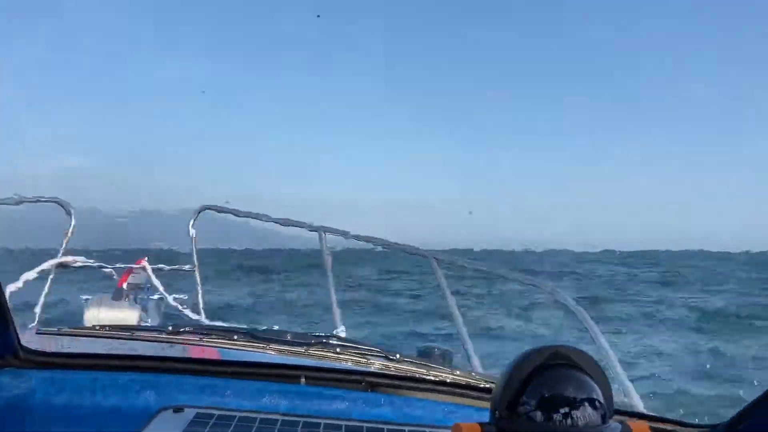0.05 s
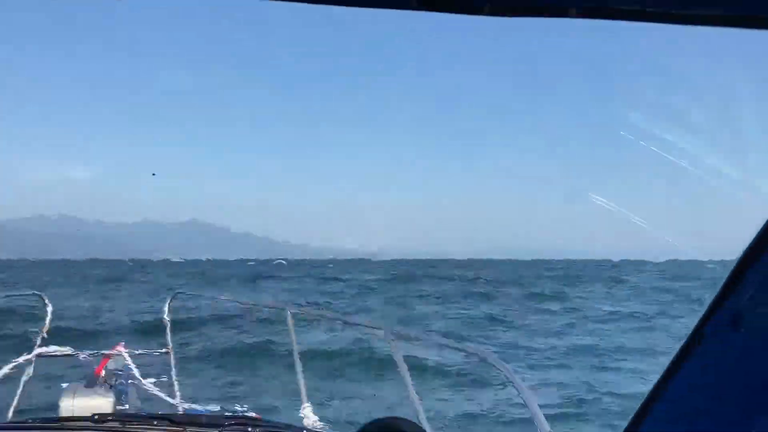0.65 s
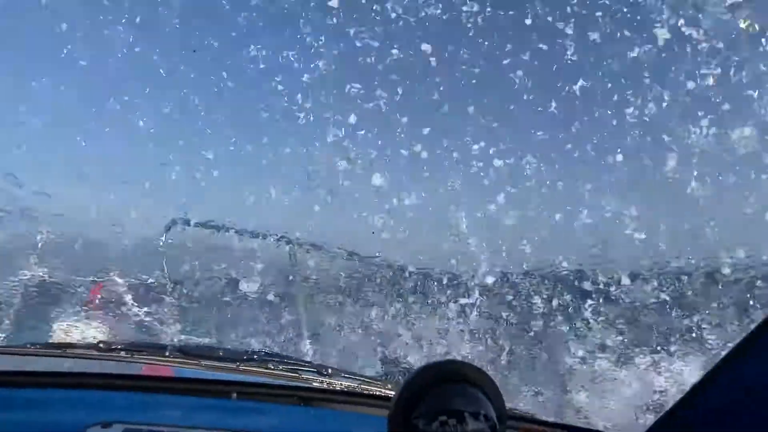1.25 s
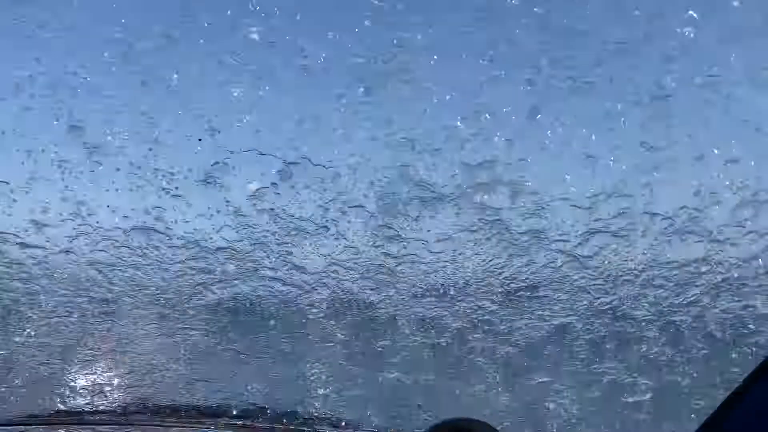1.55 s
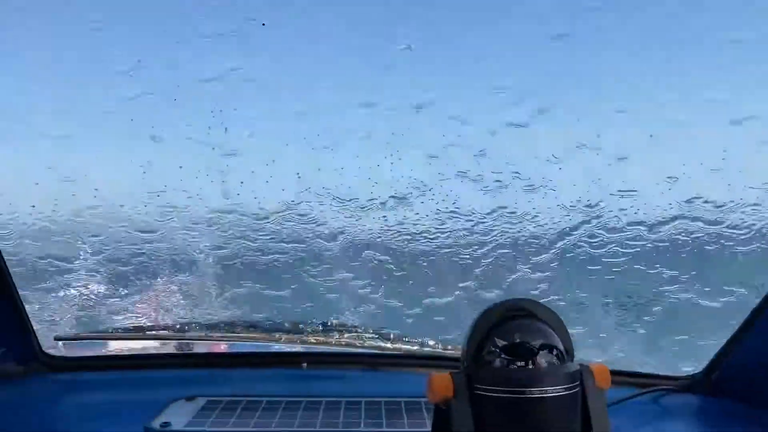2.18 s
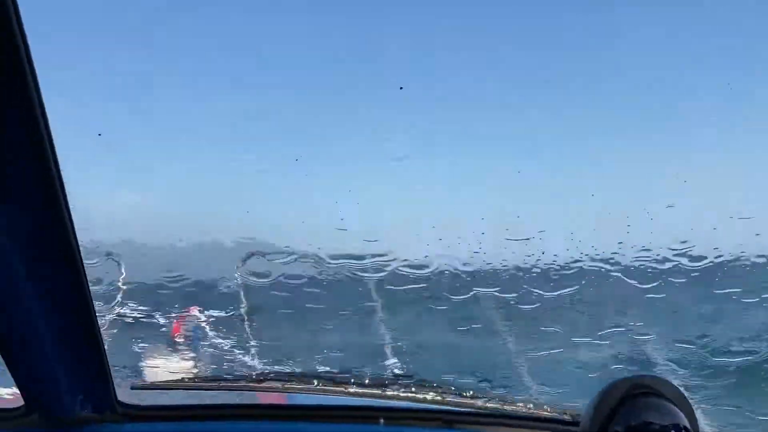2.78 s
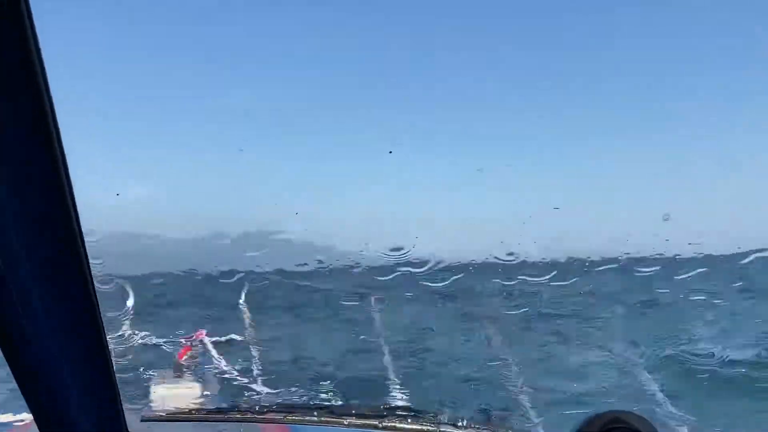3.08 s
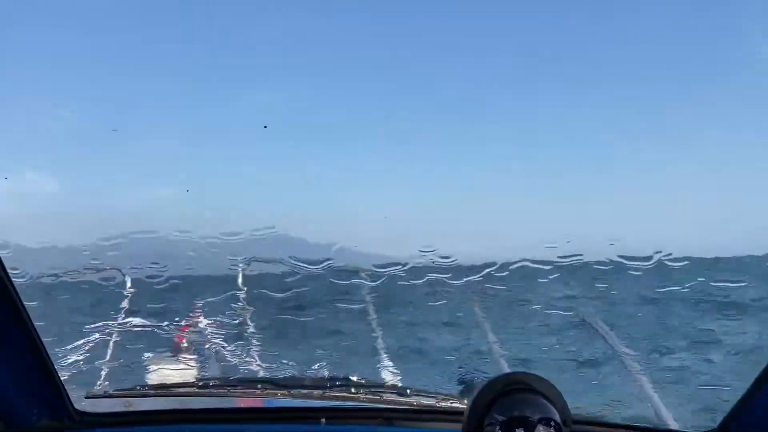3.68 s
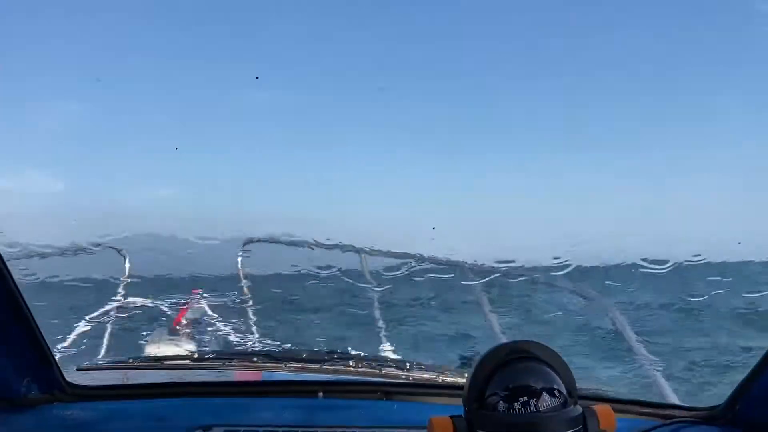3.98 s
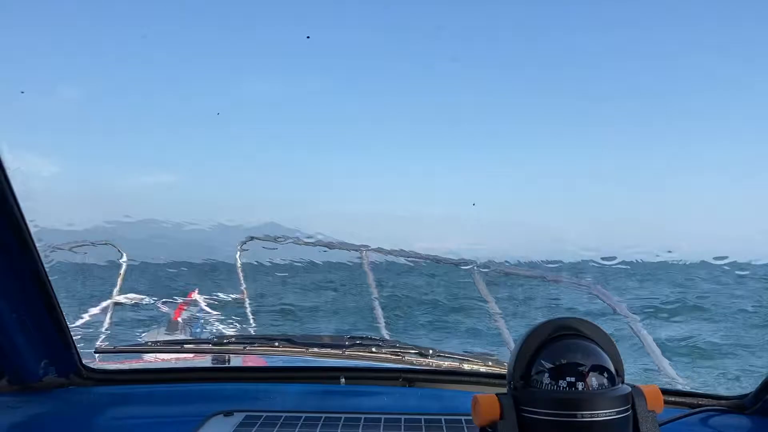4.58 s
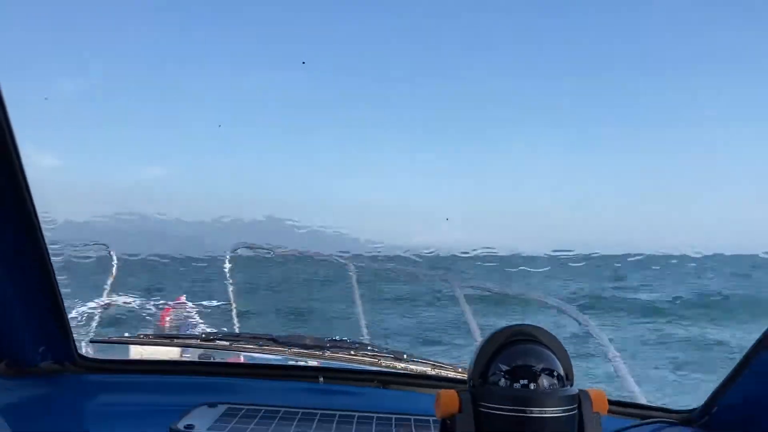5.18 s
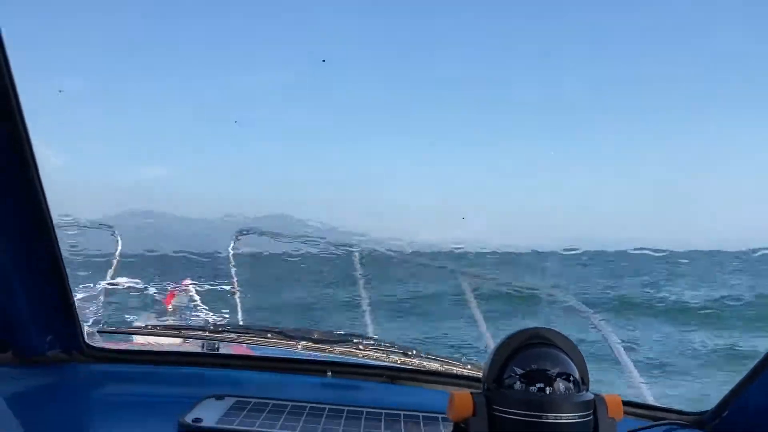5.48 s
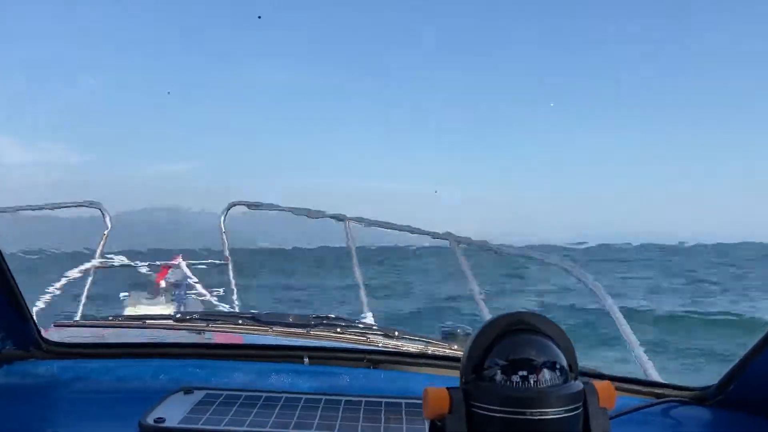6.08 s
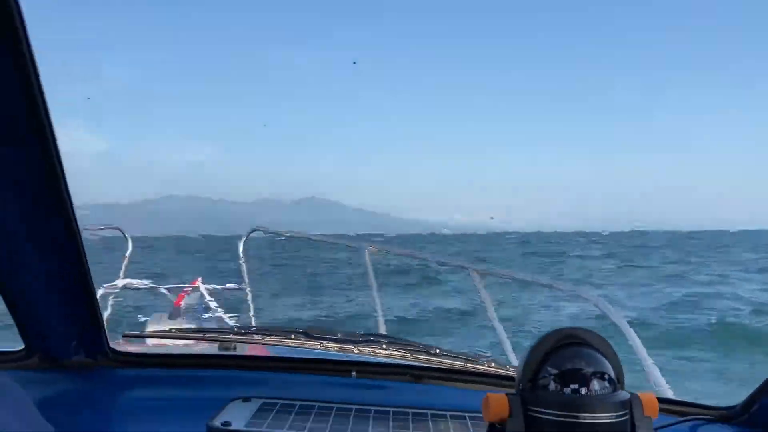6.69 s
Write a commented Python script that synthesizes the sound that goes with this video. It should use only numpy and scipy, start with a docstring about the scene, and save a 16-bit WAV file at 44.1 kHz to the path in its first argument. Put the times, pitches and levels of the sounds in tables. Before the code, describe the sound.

A small motorboat pushes through choppy sea, heard in stereo from within its cabin. A low engine drone, hull rumble and churning water run throughout. Heavy waves hit the bow in the first half, each with a boom and a smack of water on the glass, amid showers of hissing spray. A fitting buzzes faintly twice, and smaller thumps and hollow slaps keep coming to the end.

```python
"""Inside the cabin of a small motorboat in choppy sea, on a stereo pair of microphones.
From the start the engine drones and rattles, water rushes and gurgles along the hull, and spray hisses
on the windshield. Waves slam the bow near 0.5, 1.8 and 3.2 s: panels boom, trapped air slaps, sheets of
water smack the glass. Two faint buzzes of cabin fittings follow. More slams come from 4.3 to 5.6 s and
around 6.5 s, while the engine runs on."""
import sys
import numpy as np
from scipy import signal
from scipy.fft import rfft, irfft, next_fast_len
from scipy.io import wavfile
from scipy.ndimage import uniform_filter1d, minimum_filter1d

SR = 44100
rng = np.random.default_rng(int(sys.argv[2]) if len(sys.argv) > 2 else 0)


def write(x):
    x = np.atleast_2d(x).T
    wavfile.write(sys.argv[1], SR, np.round(np.clip(x, -1, 1) * 32767).astype(np.int16))


N = 302085
T = np.arange(N) / SR
CYLINDERS = 5
FOAM_LINGER_S = 1.0


def gain_of(db):
    return 10 ** (np.asarray(db) / 20)


def unit_rms(x):
    return x / np.sqrt(np.mean(x ** 2) + 1e-20)


def at_hz(points, hz):
    """A spectrum table read on a log-frequency axis."""
    f, value = np.transpose(points)
    return np.interp(np.log(hz + 1), np.log(f + 1), value)


def follow(points):
    """A time curve at every sample."""
    return np.interp(T, *np.transpose(points))


def add(mix, s, sound):
    """Lays a sound into the mix at time s."""
    part = mix[:, max(round(s * SR), 0):][:, :sound.shape[1]]
    part += sound[:, :part.shape[1]]


def drift(rate_hz):
    """A random wander of rms 1, with little motion above the rate."""
    step = 128
    knots = rng.standard_normal(N // step + 2)
    f = np.fft.rfftfreq(len(knots), step / SR)
    slow = unit_rms(irfft(rfft(knots) / (1 + (f / rate_hz) ** 4), len(knots)))
    return np.interp(np.arange(N) / step, np.arange(len(slow)), slow)


def bell(s, half_s):
    """A smooth swell of height 1 around time s."""
    return np.exp(-((T - s) / half_s) ** 2)


def surge(rise_s, t60):
    """A load that builds up, then falls 60 dB in t60 seconds."""
    t = T[:SR]
    return np.minimum(t / rise_s, 1) * gain_of(-60 * np.maximum(t - rise_s, 0) / t60)


def grains(per_s, spread_db, size=N):
    """Two trains of random impacts: many small, a few large."""
    chance = rng.uniform(-1, 1, (2, size)) * SR / per_s
    hit = abs(chance) < 1
    strength = np.minimum(-np.log(abs(chance[hit])), 4)
    out = np.zeros((2, size))
    out[hit] = np.sign(chance[hit]) * gain_of(spread_db * strength)
    return unit_rms(out)


def ring(drive, hz, width_hz):
    """One resonance."""
    r = np.exp(-np.pi * width_hz / SR)
    poles = [1, -2 * r * np.cos(2 * np.pi * hz / SR), r * r]
    return signal.lfilter([(1 - r) / 2, 0, (r - 1) / 2], poles, drive)


def plinks(count, low_hz, high_hz, db, tilt_db, t60, glide, spread_db):
    """Short rings at random times, pitches and sides; level tilts per octave, pitch climbs as each dies."""
    out = np.zeros((2, N))
    for when, pitch, size, side, life in rng.random((count, 5)):
        hz, length = low_hz * (high_hz / low_hz) ** pitch, t60 * (.5 + life)
        t = T[:round(length * SR)]
        attack = 1 - np.exp(-t * hz / 2)
        tone = attack * np.sin(2 * np.pi * hz * t * (1 + glide * t / length / 2))
        level_db = db + tilt_db * np.log2(hz / low_hz) + spread_db * min(-np.log(1 - size), 3)
        pan = np.sqrt([[side], [1 - side]])
        add(out, when * N / SR, pan * tone * gain_of(level_db - 60 * t / length))
    return out


def reflected(x, t60=0.1084, wet=0.459):
    """Close walls and windows return a short, dense cluster of echoes, different at each microphone."""
    t = T[:SR // 8]
    taps = rng.standard_normal((2, len(t))) * gain_of(-60 * t / t60)
    taps *= wet / np.linalg.norm(taps[0])
    taps[:, 0] = 1  # direct sound
    return signal.oaconvolve(x, taps, axes=1)[:, :x.shape[1]] / np.hypot(1, wet)


# How alike the two microphones hear the cabin: f/Hz, likeness (negative is opposed)
MIC_LIKENESS = [(60, 0.978), (130, 1), (200, 0.64), (300, 0.144), (800, 0.208), (1600, -0.247),
                (2300, 0.035), (5900, -0.063), (7100, 0.78), (9200, -1.303), (10900, 0.87), (11800, 0.84),
                (13600, -1.23), (15400, 0.57)]
# Balance across the pair: f/Hz, left minus right/dB
MIC_BALANCE = [(60, 5.5), (120, 3), (220, 3), (400, 2), (1300, 2), (2400, 1.5), (4400, 0)]

def in_cabin(drive, colour):
    """Two unrelated signals coloured and spread over the pair at rms 1:
    bass alike and to the left, middle diffuse, high treble by turns alike and opposed."""
    size = next_fast_len(drive.shape[1], True)
    hz = np.fft.rfftfreq(size, 1 / SR)
    a, b = rfft(drive.astype(np.float32), size)
    same = np.clip(at_hz(MIC_LIKENESS, hz), -1, 1)
    lean = gain_of(at_hz(MIC_BALANCE, hz) / 2)
    left, right = a * lean, (same * a + np.sqrt(1 - same ** 2) * b) / lean
    pair = np.array([left, right]) * gain_of(at_hz(colour, hz))
    return unit_rms(irfft(pair.astype(np.complex64), size)[:, :drive.shape[1]])


def engine_tone(angle, order, db, lean_db, unsteady, waver_hz=4):
    """One order of the engine cycle, wavering in strength and phase."""
    phase = round(order) * angle + 2 * np.pi * rng.random()
    tone = (np.sqrt(2) + unsteady * drift(waver_hz)) * np.cos(phase)
    tone += unsteady * drift(waver_hz) * np.sin(phase)
    return gain_of(db) * tone / np.hypot(1, unsteady) * gain_of([[lean_db / 2], [-lean_db / 2]])


# Faint overtones ringing round the cabin: multiple of the firing rate, level/dB
FIRING_OVERTONES = [(5, -45.5), (6, -52), (8, -50.5), (10, -50.5), (15, -52)]

def overtones(angle):
    """The higher overtones reach each microphone by their own paths, and waver apart."""
    def side():
        return sum(engine_tone(angle, k * CYLINDERS, db, lean_db=0, unsteady=1.4)[0]
                   for k, db in FIRING_OVERTONES)
    return np.array([side(), side()])


# Firing rate, easing off a little: t/s, f/Hz
FIRING_RATE = [(0, 99.51), (2.0, 98.93), (2.9, 98.21), (6.85, 97.88)]
# The wavering octave of the firing tone: t/s, relative level/dB
OCTAVE_LEVEL = [(0.0, -34.5), (0.11, -28), (0.32, -43.5), (0.52, -24), (0.57, -31.5), (0.76, -27.5),
                (0.93, -34), (0.97, -26.5), (1.68, -24), (1.75, -29.5), (1.89, -21), (2.17, -39.5),
                (2.25, -29.5), (3.24, -22), (3.43, -36), (3.47, -28.5), (3.78, -23.5), (4.37, -28),
                (4.43, -23), (4.62, -29.5), (5.07, -19.5), (5.13, -26), (6.1, -25), (6.18, -33.5),
                (6.32, -23), (6.85, -27.5)]
# Unequal cylinders: multiple of the engine cycle, level/dB, left minus right/dB, unsteadiness 0-1
LOPE_ORDERS = [(2, -41.5, 4.5, 0.6), (3, -28.5, 6.5, 0.69), (4, -29.5, 11.5, 0.82), (6, -34, 5, 0.74),
               (11, -42, 4.5, 0.96), (12, -45.5, 6.5, 1)]
# Mechanical noise of the engine, from the cabin: f/Hz, relative level/dB
CLATTER_COLOUR = [(90, -7.5), (160, 4), (220, 3), (280, -4.5), (390, -2.5), (445, -6.5), (500, -1.5),
                  (590, -5.5), (1000, -8.5), (1700, -13), (2200, -12.5), (3000, -18.5), (6500, -23.5),
                  (14000, -52)]

def engine(firing_db=-16, sag_db=2.5, clatter_db=-31.5, pulsing=0.16, lope=0.091, hunting=0.00316):
    """Firing pulses drone and shake out a rattle; unequal cylinders lope; wave load dips the drone."""
    firing_hz = follow(FIRING_RATE) * (1 + hunting * drift(9.06))
    cycles = np.cumsum(firing_hz) / SR / CYLINDERS
    angle = (2 * np.pi * (cycles % 1)).astype(np.float32)
    loaded_db = firing_db - sag_db * wave_load(linger_s=0.26)
    octave_db = follow(OCTAVE_LEVEL) - 1.4
    drone = engine_tone(angle, CYLINDERS, loaded_db, lean_db=8.5, unsteady=0.09)
    drone += engine_tone(angle, 2 * CYLINDERS, octave_db, lean_db=4.0, unsteady=0.38, waver_hz=7)
    drone += sum(engine_tone(angle, *row) for row in LOPE_ORDERS) + overtones(angle)
    beat = 1 + pulsing * np.cos(CYLINDERS * angle) + lope * np.cos(2 * angle)
    clatter = in_cabin(reflected(beat * rng.standard_normal((2, N))), CLATTER_COLOUR)
    return drone + gain_of(clatter_db) * clatter


# Dull heaves of the swell underfoot: t/s, level/dB
SWELL_HEAVES = [(1.07, -21), (1.99, -20.5), (3.26, -13.5), (3.65, -21.5)]
# Rumble of the hull around the microphones: f/Hz, relative level/dB
HULL_COLOUR = [(10, -23.5), (22, -26), (32, -15.5), (50, 0.5), (80, -1.5), (110, -1.5), (145, -11.5),
               (165, -9), (185, -9), (230, -14.5), (300, -31.5), (900, -70)]

def hull_shudder(running_db=-27, loaded_db=-15):
    """The hull shudders as it runs, harder after each slam and as the swell heaves under it."""
    level = np.hypot(gain_of(running_db), gain_of(loaded_db) * wave_load(linger_s=0.233))
    heaves = sum(gain_of(db) * bell(s, half_s=0.062) for s, db in SWELL_HEAVES)
    return np.hypot(level, heaves) * in_cabin(rng.standard_normal((2, N)), HULL_COLOUR)


# Water just outside the cabin wall: f/Hz, relative level/dB
WATER_COLOUR = [(60, -13), (160, 5.5), (240, 0.5), (350, 1), (520, -1.5), (850, -4.5), (1200, -7.5),
                (1700, -11.5), (3000, -19), (6000, -32.5), (14000, -41.5)]

def water_rush(running_db=-34.5, foam_db=-32.5, churn_db=1.67):
    """Churning water rushes along the hull and swells with the foam behind each slam."""
    level = np.hypot(gain_of(running_db), gain_of(foam_db) * wave_load(FOAM_LINGER_S))
    level *= gain_of(churn_db * drift(21.4))
    return level * in_cabin(reflected(grains(per_s=5000, spread_db=3.03)), WATER_COLOUR)


def gurgles(foam_lift_db=4):
    """Bubbles ring along the hull, louder in the foam behind a slam."""
    bubbles = plinks(count=420, low_hz=480, high_hz=2800, db=-34.3, tilt_db=-3.5,
                     t60=0.133, glide=0.102, spread_db=1.9)
    return reflected(bubbles) * gain_of(foam_lift_db * np.minimum(wave_load(FOAM_LINGER_S), 1))


# Showers over the windshield: t/s at the thickest, level/dB, half length/s
SPRAY_SHOWERS = [(.04, -39.5, .12), (.6, -34, 0.234), (1.1, -36.5, 0.4), (1.473, -37, 0.068),
                 (1.904, -34, 0.26), (2.47, -35.5, 0.192), (2.896, -37, 0.103), (3.832, -37, 0.245),
                 (5.05, -42, .15), (5.6, -41.5, 0.193)]
# Their hiss from behind the glass: f/Hz, relative level/dB
HISS_COLOUR = [(400, -10), (1500, 4.5), (3000, 4.5), (4500, 4), (5800, -1.5), (7500, 1), (11300, 1.07),
               (13500, -3.5), (16000, -3.5)]

def spray(mist_db=-39.5, patter_db=-5.0, flicker_db=0.56):
    """Fine mist hisses and larger drops tick on the glass, both thickening with each shower."""
    fall = rng.standard_normal((2, N)) + gain_of(patter_db) * grains(per_s=1500, spread_db=3.84)
    shower_power = sum(gain_of(db) ** 2 * bell(s, half) for s, db, half in SPRAY_SHOWERS)
    thickness = np.sqrt(gain_of(mist_db) ** 2 + shower_power)
    drops = plinks(count=1800, low_hz=2699.3, high_hz=8500, db=-7, tilt_db=-2.5,
                   t60=0.0413, glide=0.021, spread_db=2)
    hiss = in_cabin(reflected(fall, t60=0.124, wet=0.253), HISS_COLOUR)
    return (hiss + drops) * thickness * gain_of(flicker_db * drift(24.3))


# Hull and cabin panels, close around the pair: f/Hz, width/Hz, relative level/dB
PANEL_MODES = [(54.7, 28, 1), (75.4, 13.4, -7.5), (125, 33.8, -7.5), (166.3, 17.9, 2), (222.1, 41.8, -1.5),
               (298.5, 10, -12), (494, 44, -15.5)]

def panel_boom():
    """The panels ring at their resonances under a random load."""
    drive = rng.standard_normal((2, N))
    ringing = sum(gain_of(db) * ring(drive, hz, width) for hz, width, db in PANEL_MODES)
    return in_cabin(ringing, colour=[(20, -10), (45, 2), (500, -1), (1500, -26)])


# A slam heard through the hull, and the water it tears off the bow: f/Hz, relative level/dB
CRASH_COLOUR = [(110, -11.5), (215, 7.5), (330, -5.5), (510, 3), (610, -3), (760, -2.5), (1200, -8.5),
                (1700, -15), (2600, -22), (7000, -40.5), (14000, -59)]
BOW_SPLASH_COLOUR = [(400, -13.5), (1100, 2), (2000, -2), (3000, -9), (7000, -18.5), (14000, -36.5)]
# The bow wave fanning out: t/s at the fullest, level/dB, half length/s
BOW_WASH = [(.585, -27.5, .055), (1.6, -35, .18), (3.16, -34, .05), (3.24, -26, .048), (6.59, -32, .07)]
# Waves striking the bow, ahead of the cabin: t/s, relative level/dB, rise/s, boom and splash offsets/dB
BOW_SLAMS = [(.24, -31.5, 0.0435, 1.5, -7), (.34, -30, 0.043, 1.5, -3), (.455, -24, 0.029, 2.5, -5.5),
             (.492, -16, 0.03, 2, -16), (.54, -19, 0.035, 2, -12), (.585, -22, .03, 7, -18),
             (.705, -28.5, 0.05, 6, -8), (.815, -32, 0.03, 5, -10), (1.39, -32.5, 0.0426, 7.5, -2.5),
             (1.778, -22.5, 0.02, 1, -7), (1.825, -18.5, 0.045, 0, -9), (1.893, -23, 0.016, 2, -19),
             (2.01, -31, 0.025, 6.5, -16), (2.51, -31.5, 0.0344, 6.5, -13.5), (3.16, -21.5, 0.055, 6, -2.5),
             (3.235, -27, 0.018, 10, -12), (4.258, -30, 0.023, 4.5, -10.5), (4.375, -31.5, 0.031, 4.5, -2),
             (4.603, -28, 0.014, 3.5, -8.5), (4.875, -24.5, 0.0274, 3, -8), (4.985, -29, 0.02, 5, -3),
             (5.05, -31.5, .02, 8, -6.5), (5.46, -32.5, 0.014, 4.5, -10), (5.6, -31.5, 0.0434, -6.5, -8),
             (6.43, -27.5, 0.035, -9, -4), (6.485, -25, 0.05, 3, -11), (6.54, -24.5, 0.06, -2, -12),
             (6.78, -30, 0.03, 2.5, -17.5)]

def slams(crash_db=2.5, boom_db=2, lumps_db=0.5, t60=0.42):
    """Each wave loads the bow with a swarm of small blows: a crash, a boom of the panels and a splash."""
    power = np.zeros((3, N))
    for s, db, rise, boom_offset, splash_offset in BOW_SLAMS:
        peaks = gain_of([[db], [db + boom_offset], [db + splash_offset]])
        add(power, s, (peaks * surge(rise, t60)) ** 2)
    power[2] += sum((gain_of(db) * bell(s, half)) ** 2 for s, db, half in BOW_WASH)
    crash_load, boom_load, splash_load = np.sqrt(power)
    crash = crash_load * in_cabin(reflected(grains(per_s=4000, spread_db=2.6)), CRASH_COLOUR)
    boom = boom_load * panel_boom()
    splash = splash_load * in_cabin(grains(per_s=6000, spread_db=2.5), BOW_SPLASH_COLOUR)
    lumps = gain_of(lumps_db * drift(48.0))
    return (gain_of(crash_db) * crash + gain_of(boom_db) * boom + splash) * lumps


def wave_load(linger_s, full_load_db=-15):
    """How hard the waves work the hull: each slam builds a load that ebbs away."""
    power = np.zeros((1, N))
    t = T[:3 * SR]
    for s, db, rise, _, _ in BOW_SLAMS:
        build = 1 - np.exp(-t / rise)
        ebb = np.exp(-np.maximum(t - 2 * rise, 0) / linger_s)
        add(power, s, (gain_of([[db - full_load_db]]) * build * ebb) ** 2)
    return np.sqrt(power[0])


# Air trapped under the hull, and a few louder bubbles gurgling along it (near 0.32, 0.39, 2.09 and 5.65 s):
# t/s, level/dB, f/Hz, nominal width/Hz, decay by 60 dB/s
AIR_POCKETS = [(.318, -33, 801, 50, 0.48), (.385, -32.5, 1233, 70, .15), (.518, -21, 530, 70, .3),
               (1.893, -23, 540, 70, .25), (2.085, -33.5, 611, 45, 0.07), (3.205, -18.5, 720, 50, 0.24),
               (3.243, -17, 258, 40, .18), (4.275, -28.5, 755, 110, 0.2), (4.295, -29, 610, 40, 0.15),
               (4.608, -25.5, 493, 45, .22), (4.881, -16.5, 610, 100, 0.18), (4.922, -24, 600, 45, .14),
               (4.998, -29.5, 1246, 120, 0.22), (5.645, -34, 749.7, 50, 0.42),
               (6.585, -29, 1100, 120, 0.12), (6.595, -22, 511, 45, .17)]

def air_pockets(rise_s=0.0091, lean_db=1):
    """Air caught between wave and hull rings with a hollow slap; a few rows are single louder bubbles gurgling
    along the hull."""
    out = np.zeros((2, N))
    for s, db, hz, width, t60 in AIR_POCKETS:
        blows = grains(per_s=2500, spread_db=1.2, size=SR)
        mid, side = ring(ring(blows, hz, 2 * width), hz, 2 * width)
        pair = np.array([mid + side / 2, mid - side / 2]) * gain_of([[lean_db], [-lean_db]])
        load = surge(rise_s, t60)
        add(out, s, gain_of(db) * unit_rms(pair * load) * np.sqrt(np.mean(load ** 2)))
    return out


# Sheets of water on the windshield: t/s, level/dB, decay by 60 dB/s
GLASS_SMACKS = [(.467, -34, .08), (1.724, -29, 0.08), (3.165, -26, 0.17), (3.352, -37, .06)]
# A smack from behind the glass: f/Hz, relative level/dB
GLASS_COLOUR = [(500, -16), (2500, 3.5), (6000, -1), (11000, 0.5), (16000, -5)]

def windshield_smacks(rise_s=0.0051):
    """A whole sheet of water hits the glass as one dense burst of drops."""
    out = np.zeros((2, N))
    for s, db, t60 in GLASS_SMACKS:
        burst = in_cabin(grains(per_s=9000, spread_db=2.4, size=SR), GLASS_COLOUR)
        add(out, s, gain_of(db) * surge(rise_s, t60) * burst)
    return out


# Faint buzzes in the cabin, near the microphones: t/s, length/s, f/Hz, level/dB
FITTING_BUZZES = [(3.448, .3, 1379, -46), (3.87, .34, 1472, -42.5)]

def fittings(width_hz=40):
    """A cabin fitting buzzes in sympathy, a narrow resonance that swells and fades."""
    out = np.zeros((2, N))
    for s, length, hz, db in FITTING_BUZZES:
        shaking = rng.standard_normal((2, SR))
        tone = unit_rms(ring(ring(shaking, hz, width_hz), hz, width_hz))
        swell = signal.windows.tukey(round(length * SR), .5)
        add(out, s, gain_of(db) * swell * tone[:, -len(swell):])
    return out


def scene():
    """Everything that reaches the pair in the cabin."""
    under_way = engine() + hull_shudder() + water_rush() + gurgles() + spray()
    return under_way + slams() + air_pockets() + windshield_smacks() + fittings()


def record(dry, ceiling=.92, edge_hz=15800):
    """Behind the microphones, a quick limiter holds peaks to the ceiling; a low-pass ends the treble."""
    allowed = np.minimum(1, ceiling / (abs(dry).max(0) + 1e-9))
    limited = dry * uniform_filter1d(minimum_filter1d(allowed, size=900), size=900)
    low_pass = signal.firwin(511, edge_hz, window=("kaiser", 9), fs=SR)
    return signal.oaconvolve(limited, low_pass[None], "same")


dry = scene()
out = record(dry)
write(out)
```